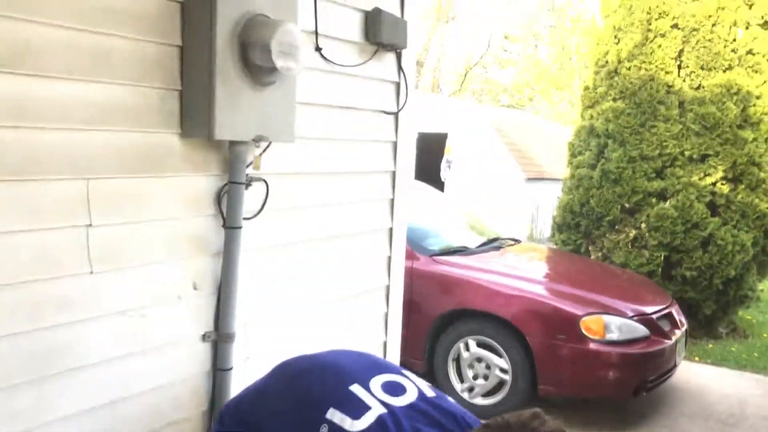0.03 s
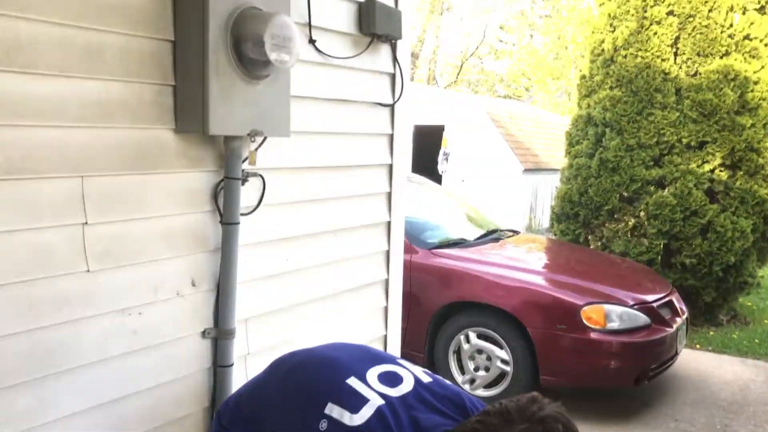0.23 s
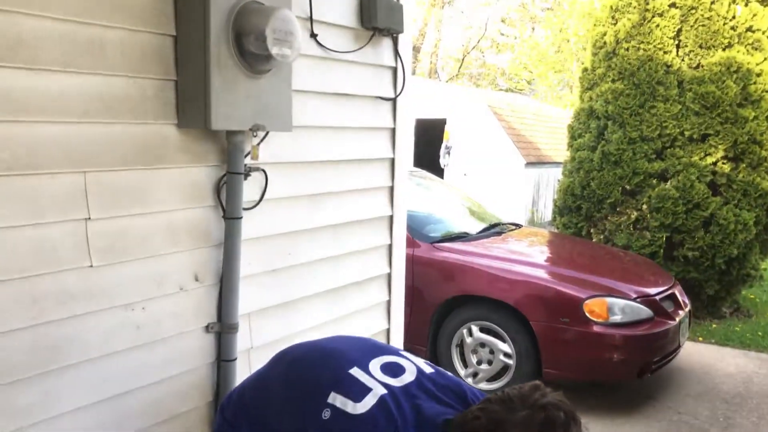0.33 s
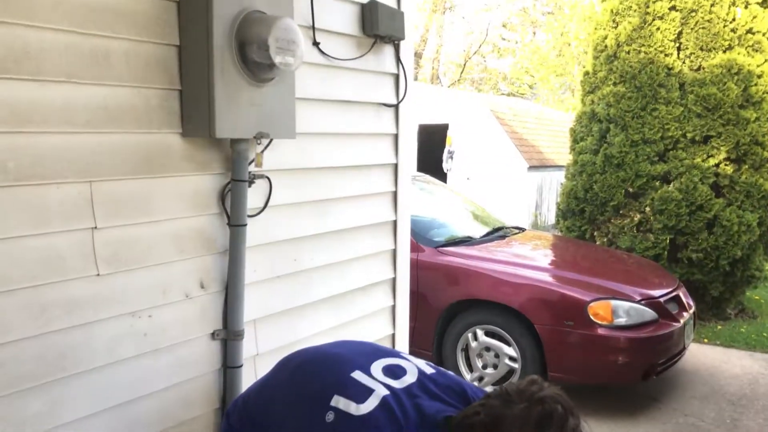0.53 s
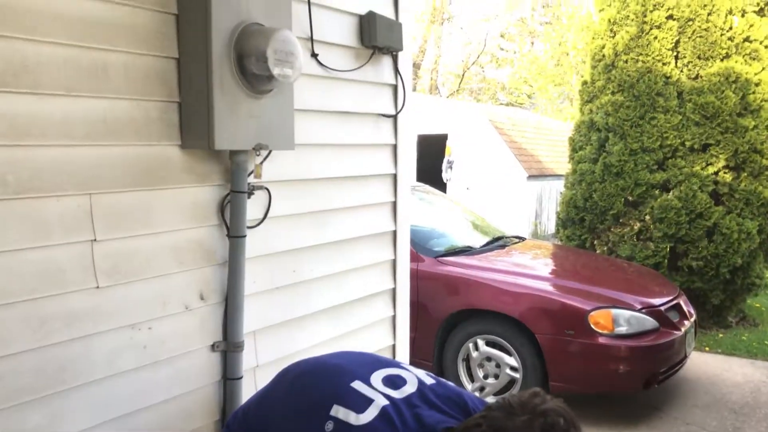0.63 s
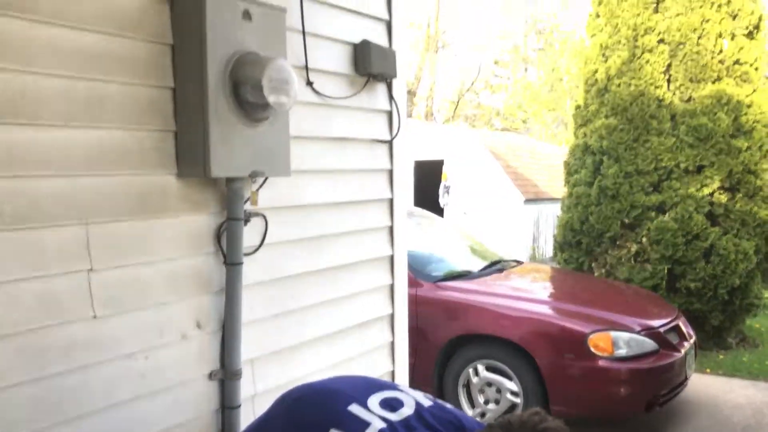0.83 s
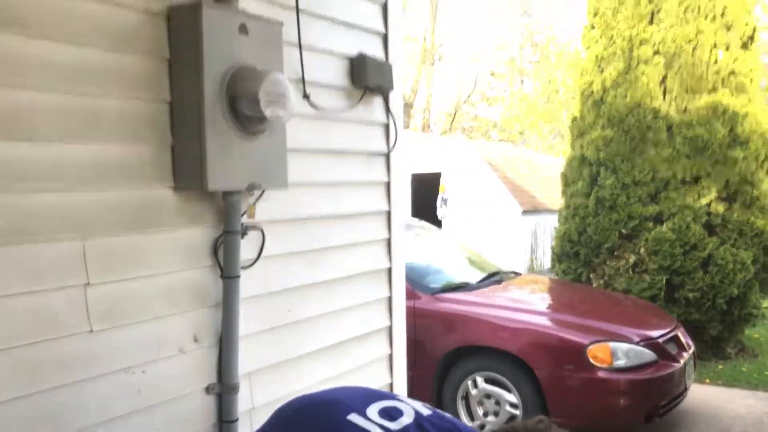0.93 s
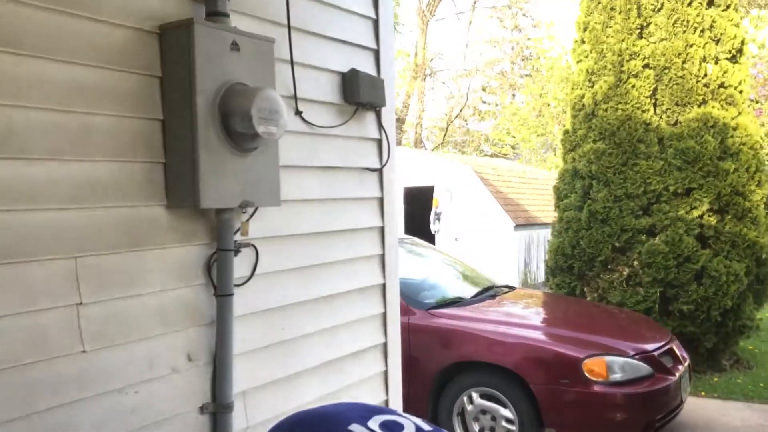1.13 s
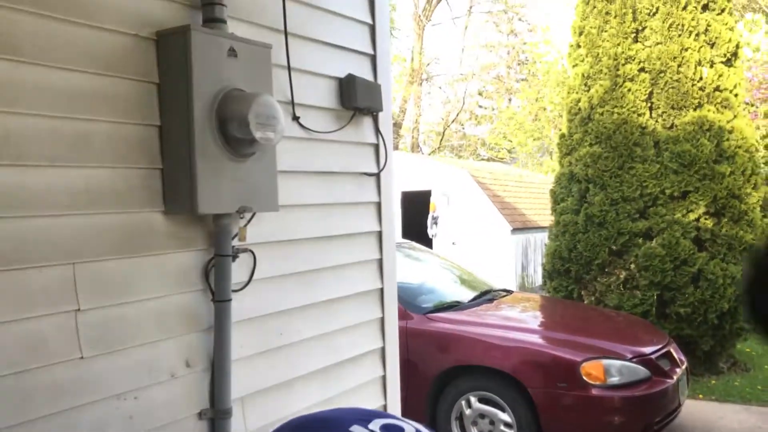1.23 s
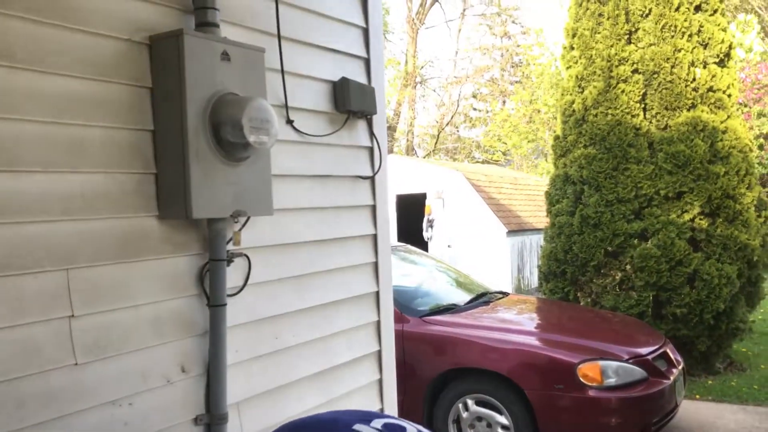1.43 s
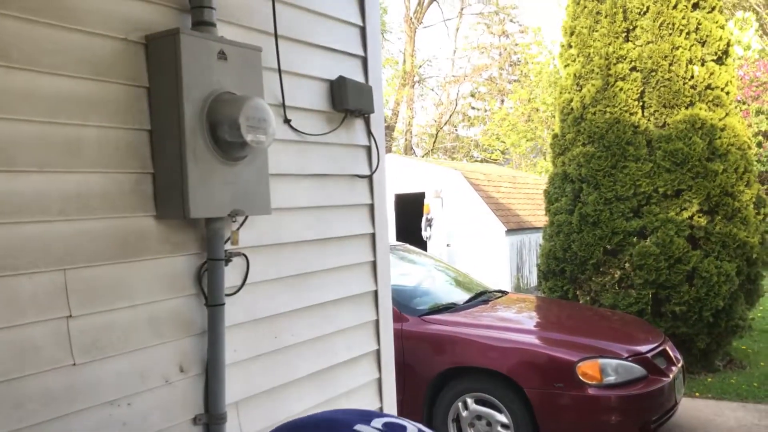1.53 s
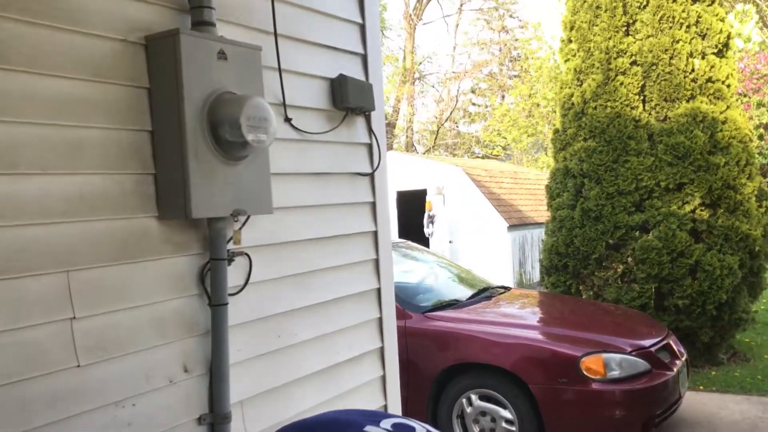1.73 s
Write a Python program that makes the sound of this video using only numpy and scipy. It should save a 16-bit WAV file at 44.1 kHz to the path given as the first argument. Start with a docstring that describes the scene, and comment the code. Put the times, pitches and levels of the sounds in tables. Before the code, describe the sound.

In a yard beside a house, two snapping blows hit a hard panel near the microphone. Soft taps, clinks and clothing rustles follow, with a low far-off engine drone and very faint bird chirps behind.

```python
"""A yard beside a house: two sharp knocks on a hard panel, the second on a slightly different spot.
Each blow snaps and cracks; the panel gives way with a thud, bending waves set its modes ringing,
and wall and yard return a spray of reflections. Someone shifts, with faint taps, clinks and rustles.
Behind it: thin far chirps, the drone of a far engine, outdoor hiss and rumble."""
import sys
import numpy as np
from scipy import signal
from scipy.fft import rfft, irfft
from scipy.io import wavfile

SR = 44100
rng = np.random.default_rng(int(sys.argv[2]) if len(sys.argv) > 2 else 0)


def int16_out(signal):
    """Quantize to a 16-bit WAV file."""
    q = np.round(np.clip(np.atleast_2d(signal).T, -1, 1) * 32767)
    wavfile.write(sys.argv[1], SR, q.astype(np.int16))


N = 79380
TIME_S = np.arange(N) / SR
FREQ_HZ = np.maximum(np.fft.rfftfreq(N, 1 / SR), 1)


def from_db(db):
    """Decibels to gain."""
    return 10 ** (np.asarray(db) / 20)


def at_hz(points, hz):
    """Table lookup on a log-frequency axis."""
    f, value = np.transpose(points)
    return np.interp(np.log(hz), np.log(f), value)


def in_time(rows):
    """Table columns interpolated to every sample."""
    times_s, *columns = np.transpose(rows)
    return [np.interp(TIME_S, times_s, column) for column in columns]


def noise(gain):
    """Unit-rms noise, spectrum shaped by gain."""
    x = irfft(rfft(rng.standard_normal(N)) * gain, N)
    return x / np.sqrt(np.mean(x ** 2) + 1e-20)


def flutter(corner_hz):
    """Low-passed random wobble, unit rms."""
    return noise(1 / (1 + (FREQ_HZ / corner_hz) ** 2))


def band(hz, octaves):
    """Unit-rms noise peaked at hz."""
    return noise(1 / (1 + (np.log2(FREQ_HZ / hz) / octaves) ** 2 / 2) ** 2)


def swell(mid_s, sigma_s):
    """Gaussian envelope."""
    return np.exp(-((TIME_S - mid_s) / sigma_s) ** 2 / 2)


def strike(start_s, attack_s, t60_s):
    """Linear rise, exponential decay."""
    age_s = TIME_S - start_s
    return np.clip(age_s / attack_s, 0, 1) * from_db(-60 * np.maximum(age_s - attack_s, 0) / t60_s)


def burst(start_s, attack_s, spectrum_db, t60_at):
    """Noise burst with one decay time per octave."""
    spectrum = rfft(noise(from_db(spectrum_db)))
    centres_hz = np.geomspace(62.5, 16000, 9)
    out = 0
    for hz, weights in zip(centres_hz, np.eye(len(centres_hz))):
        share = np.interp(np.log(FREQ_HZ), np.log(centres_hz), weights)
        out += irfft(spectrum * share, N) * strike(start_s, attack_s, t60_at(hz))
    return out


# Crack spectrum: f/Hz, knock 1 density/dB, knock 2 density/dB
CRACK_SPECTRUM = [(35, -4, -25), (70.5, -10.5, -3.5), (302, -12, -3.5), (800, 10.5, -2.5), (1060, -2, -0.5),
                  (1460, 3.5, -8.5), (1800, 5.5, -25), (1944, -3.5, 4), (3320, -2, -9.5), (4700, 5, 6),
                  (5200, -12.5, -12.5), (6400, 0, 0), (7660, -13, -13.5), (9500, -4, -5.5),
                  (10800, -14, -13), (16000, -8.5, -11.5)]
# Blows: t/s, crack/dB, snap/dB, thud/dB, thud f/Hz, ring/dB, reflections/dB
BLOWS = [(0.2336, -13.5, -10, -6.5, 738, -21.5, -22), (0.5840, -11.5, -11.5, -9, 700, -20, -22)]
CONTACT_LAG_S, CONTACT_RISE_S = 0.00126, 0.00024  # full force follows first touch
THUD_LAG_S, GRAIN_DB = 0.0036, 4


def knocks():
    """Each blow snaps and splinters; the panel gives way, swings a few cycles and rings."""
    out = 0
    for spot, (t_s, crack_db, snap_db, thud_db, thud_hz, ring_db, yard_db) in enumerate(BLOWS):
        colour_db = at_hz([(row[0], row[1 + spot]) for row in CRACK_SPECTRUM], FREQ_HZ)
        crack = burst(t_s, 0.001, colour_db, t60_at=lambda hz: 0.097 * (hz / 1000) ** -0.017)
        crack *= from_db(crack_db + GRAIN_DB * flutter(570))
        snap = from_db(snap_db) * band(2380, octaves=0.5)
        snap *= strike(t_s + CONTACT_LAG_S, CONTACT_RISE_S, t60_s=0.019)
        thud = from_db(thud_db) * np.sin(2 * np.pi * thud_hz * (TIME_S - t_s - THUD_LAG_S))
        thud *= strike(t_s + THUD_LAG_S, CONTACT_RISE_S, t60_s=0.021)
        yard = from_db(yard_db) * reflections(t_s)
        ring = from_db(ring_db) * panel_ring(t_s, spot)
        out += snap + thud + crack + ring + yard
    return out


# Panel modes: f/Hz, nominal t60/s, knock 1 level/dB, knock 2 level/dB
PANEL_MODES = [(72.5, 0.11, -16.5, -3.5), (167.8, 0.14, -1.5, .5), (211.2, .12, 1.5, -29),
               (258.4, 0.15, -41, -8.5), (362, 0.17, -8.5, -11), (459, .08, 0.5, -29),
               (629, 0.19, -12, -4.5), (684, 0.1, 6, -1), (787, 0.094, 4.5, -6), (816, 0.065, 7, -1),
               (950, 0.15, -1, -5.5), (1003, 0.12, -21, -2.5), (1226, 0.045, -28, 0), (1216, 0.071, 5, -1),
               (1393, 0.14, -4, 5.5), (1510, .13, 1, -5.5), (1690, 0.29, -7.5, -23), (1750, 0.16, -5, -32),
               (1858, 0.11, -4.5, -2.5), (2565, 0.19, -11, -8), (3220, 0.1, 1.5, -3.5),
               (3200, 0.21, -4.5, -26), (4450, 0.31, -7.5, -5), (5560, 0.18, -4, -4.5)]
TRAVEL_1KHZ_S, RING_DAMPING = 0.001275, 1.78
AFTER_RING_DB, AFTER_RING_T60_S = -20.5, 0.27  # held by the surroundings


def panel_ring(start_s, spot):
    """Bending waves spread from the struck spot, treble first, and excite the modes."""
    out = 0
    for hz, t60_s, *levels_db in PANEL_MODES:
        age_s = np.maximum(TIME_S - start_s - TRAVEL_1KHZ_S * np.sqrt(1000 / hz), 0)
        rise = 1 - np.exp(-age_s / CONTACT_RISE_S)
        fast_decay = from_db(-60 * RING_DAMPING * age_s / t60_s)
        after_ring = from_db(AFTER_RING_DB - 60 * age_s / AFTER_RING_T60_S)
        wave = np.sin(2 * np.pi * (hz * age_s + rng.random()))
        out += from_db(levels_db[spot]) * rise * (fast_decay + after_ring) * wave
    return out


# Reflection spectrum: f/Hz, density/dB
YARD_SPECTRUM = [(30, -15), (70, -9.5), (200, 6.5), (450, -1), (800, -3.5), (1500, 2), (3000, 0),
                 (4600, -2), (7000, -3), (10000, -8.5), (16000, -6)]
# Reflection decay: f/Hz, t60/s
YARD_DECAY = [(100, 0.27), (500, 0.3), (1500, 0.27), (4000, 0.32), (9000, 0.21), (16000, 0.16)]


def reflections(start_s):
    """Diffuse return from wall and yard."""
    return burst(start_s, 0.011, at_hz(YARD_SPECTRUM, FREQ_HZ), lambda hz: at_hz(YARD_DECAY, hz))


# Soft taps: t/s, resonance level/dB, resonance f/Hz, scuff level/dB, t60/s
SOFT_TAPS = [(1.001, -52, 830, -44.5, 0.1), (1.049, -45, 520, -48.5, 0.11), (1.398, -47, 544, -47, 0.13)]
# Scuff spectrum: f/Hz, density/dB
SCUFF_SPECTRUM = [(150, 10), (300, 13), (3000, -1.5), (8000, -4), (16000, -17)]


def taps():
    """Someone shifting: hollow taps, each with a scuff."""
    out = 0
    for t_s, db, hz, scuff_db, t60_s in SOFT_TAPS:
        hollow = from_db(db) * band(hz, octaves=0.49)
        scuff = from_db(scuff_db) * noise(from_db(at_hz(SCUFF_SPECTRUM, FREQ_HZ)))
        out += (hollow + scuff) * strike(t_s, 0.0017, t60_s)
    return out


# Clinks: t/s, level/dB, f/Hz
CLINKS = [(0.52, -45, 3030), (1.588, -63, 2700), (1.651, -56, 2330)]


def clinks():
    """Brief narrow ring plus a click an octave up."""
    out = 0
    for t_s, db, hz in CLINKS:
        ring = band(hz, octaves=0.22) * strike(t_s, 0.00077, t60_s=0.066)
        click = band(2 * hz, octaves=0.75) * strike(t_s, 0.00026, t60_s=0.036)
        out += from_db(db) * (ring + click)
    return out


# Rustles: centre t/s, sigma/s, level/dB, f/Hz
RUSTLE_SWELLS = [(.0, 0.031, -48.5, 302), (0.008, 0.044, -46, 2900), (0.146, 0.019, -54.5, 3900),
                 (.82, 0.024, -58.5, 3800), (0.994, 0.029, -59.5, 7600), (1.245, 0.011, -53, 7500),
                 (1.353, 0.03, -58.5, 880), (1.482, 0.032, -61, 940), (1.63, 0.04, -57.5, 1540)]
RUSTLE_GRAIN_DB = 2.5


def rustles():
    """Someone shifting: grainy swells of broad noise."""
    out = 0
    for t_s, sigma_s, db, hz in RUSTLE_SWELLS:
        grainy_gain = from_db(db + RUSTLE_GRAIN_DB * flutter(120))
        out += grainy_gain * swell(t_s, sigma_s) * band(hz, octaves=1.05)
    return out


def crackles(rate_per_s=35, level_db=-59.5, t60_s=0.015):
    """Cloth and grit: tiny bright ticks at random times."""
    onsets = rng.random(N) < rate_per_s / SR
    kicks = onsets * rng.exponential(1, N) + 1e-18
    power_pole = from_db(-120 / (t60_s * SR))
    power = signal.lfilter([1], [1, -power_pole], kicks)
    return from_db(level_db) * np.sqrt(power) * band(9000, octaves=0.9)


# Bird chirps: centre t/s, sigma/s, level/dB, f/Hz
BIRD_CHIRPS = [(1.157, .03, -65.5, 3180), (1.235, .03, -70, 3500), (1.28, 0.0033, -60.5, 3380),
               (1.602, 0.0055, -61.5, 4380)]


def birds():
    """Far birds: thin swells of narrowband noise."""
    return sum(from_db(db) * swell(t_s, sigma_s) * band(hz, octaves=0.072)
               for t_s, sigma_s, db, hz in BIRD_CHIRPS)


# Engine drone: t/s, fundamental f/Hz, harmonic 2 level/dB, harmonic 3 level/dB, harmonic 4 level/dB
ENGINE_DRONE = [(0, 43.5, -69, -68.5, -64), (.45, 40.94, -83, -59.5, -57), (.75, 40.56, -53, -53, -62),
                (1.0, 40.88, -51.5, -45, -71), (1.25, 40.98, -52, -48.5, -67),
                (1.5, 40.81, -53, -52, -55.5), (1.8, 41.3, -55.5, -66.5, -61.5)]


def engine(pitch_wobble=0.015, level_wobble_db=0.54):
    """Far engine: three harmonics of one low, unsteady pitch."""
    hz, *levels_db = in_time(ENGINE_DRONE)
    phase = 2 * np.pi * np.cumsum(hz * (1 + pitch_wobble * flutter(6.8))) / SR
    out = 0
    for harmonic, db in enumerate(levels_db, start=2):
        amplitude = np.sqrt(2) * from_db(db + level_wobble_db * flutter(35))
        out += amplitude * np.sin(harmonic * phase + rng.uniform(0, 2 * np.pi))
    return out


# Air spectrum: f/Hz, density/dB
AIR_SPECTRUM = [(100, -2.5), (400, -5), (800, -4.5), (2000, -8), (3300, -7.5), (5000, -13), (7000, -11.5),
                (10500, -20), (16000, -20.5)]
# Air gain above the split: t/s, level/dB
TREBLE_GAIN = [(0, 3), (.2, -3.5), (.45, 7), (.9, 4.5), (1.15, 0.5), (1.4, 2.5), (1.6, -3.5), (1.8, -10)]
# Air gain below the split: t/s, level/dB
MID_GAIN = [(0, 4), (.45, 3.5), (.9, 0), (1.15, -3), (1.28, -1), (1.45, 2), (1.8, -2)]
# Rumble spectrum: f/Hz, density/dB
RUMBLE_SPECTRUM = [(18, -29), (30, -6), (42, 3), (58, 8), (100, -7.5), (140, 3), (220, -8.5), (300, -17.5),
                   (600, -75.5)]


def outdoor_air(hiss_db=-58.5, rumble_db=-50, split_hz=5630, flicker_db=1.3):
    """Hiss over low rumble; midrange and treble swell and sink, the treble flickers."""
    air = noise(from_db(at_hz(AIR_SPECTRUM, FREQ_HZ)))
    treble = irfft(rfft(air) / (1 + (split_hz / FREQ_HZ) ** 4), N)
    (treble_db,), (mid_db,) = in_time(TREBLE_GAIN), in_time(MID_GAIN)
    hiss = (air - treble) * from_db(mid_db) + treble * from_db(treble_db + flicker_db * flutter(150))
    rumble = noise(from_db(at_hz(RUMBLE_SPECTRUM, FREQ_HZ)))
    return from_db(hiss_db) * hiss + from_db(rumble_db) * rumble


def mic_hiss(level_db=-72):
    """Thin, steady microphone self-noise."""
    return from_db(level_db) * band(14400, octaves=0.17)


def scene():
    """Mono sum at the microphone."""
    floor = mic_hiss()
    foreground = knocks() + taps() + clinks() + rustles() + crackles()
    background = birds() + outdoor_air() + engine()
    return (foreground + background + floor)[None]


def record(dry, low_cut_hz=42, high_cut_hz=15800):
    """Soft clip, bass cut, steep top cut."""
    rounded = 0.95 * np.tanh(dry / 0.95)
    thinned = signal.sosfilt(signal.butter(3, low_cut_hz, "high", fs=SR, output="sos"), rounded)
    return signal.sosfilt(signal.ellip(10, 0.1, 80, high_cut_hz, fs=SR, output="sos"), thinned)


dry = scene()
out = record(dry)
int16_out(out)
```